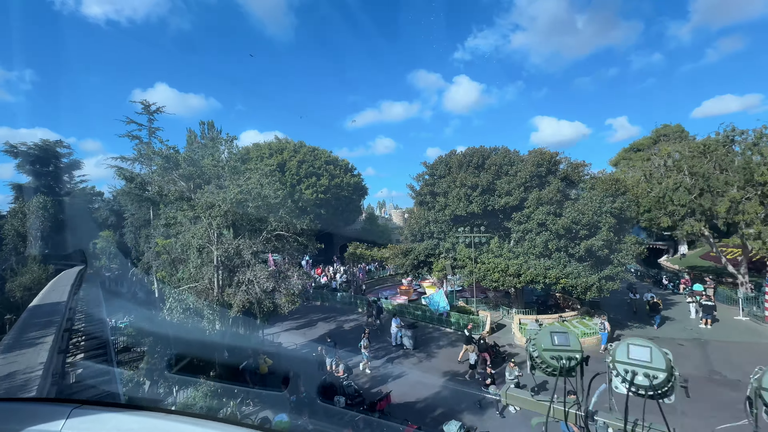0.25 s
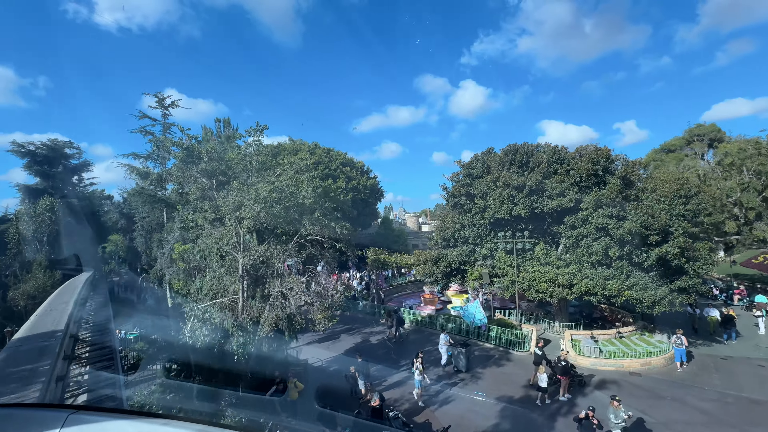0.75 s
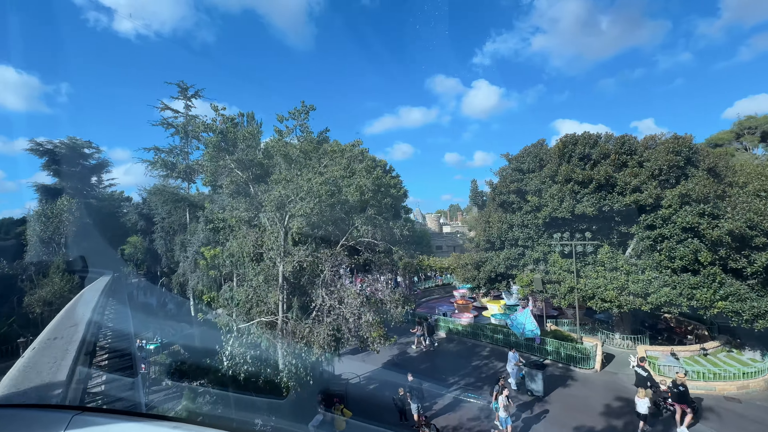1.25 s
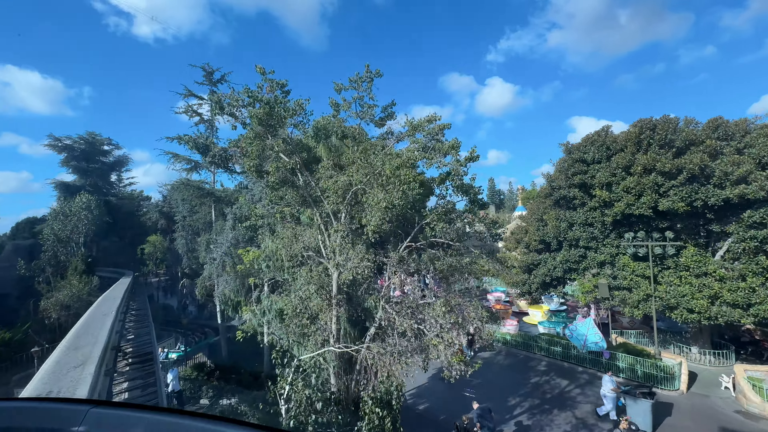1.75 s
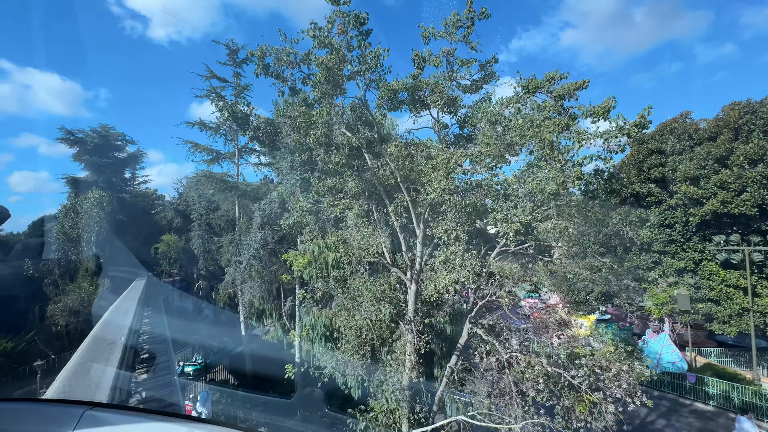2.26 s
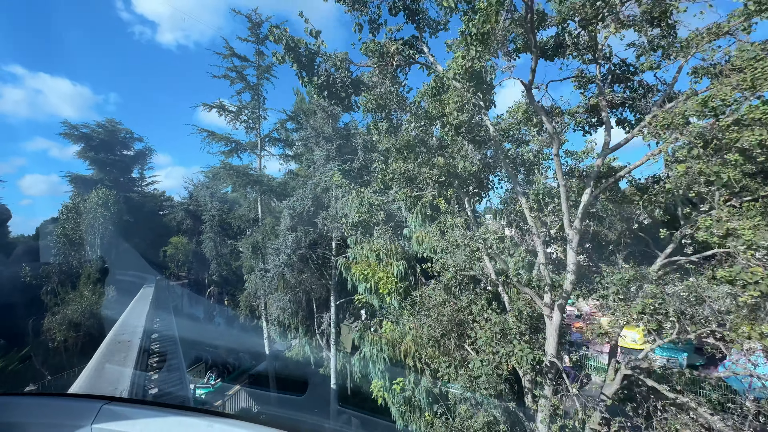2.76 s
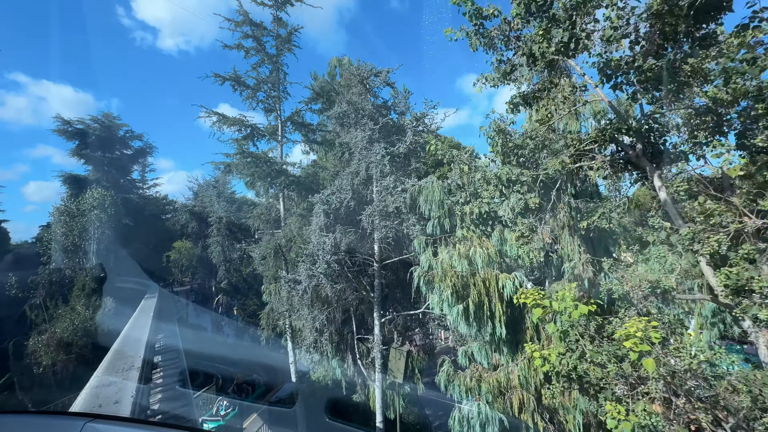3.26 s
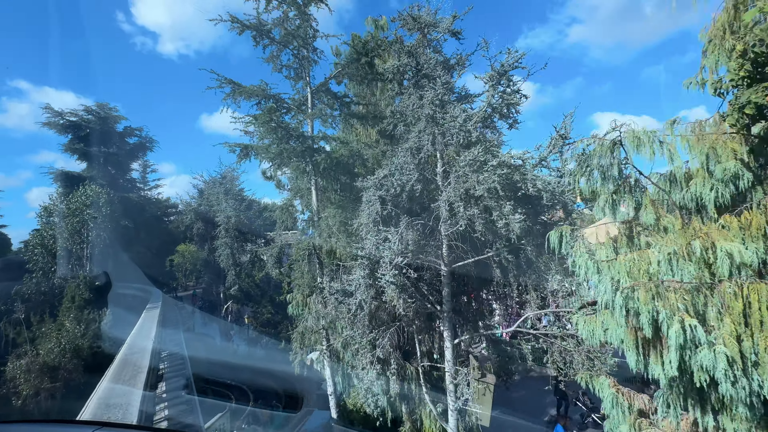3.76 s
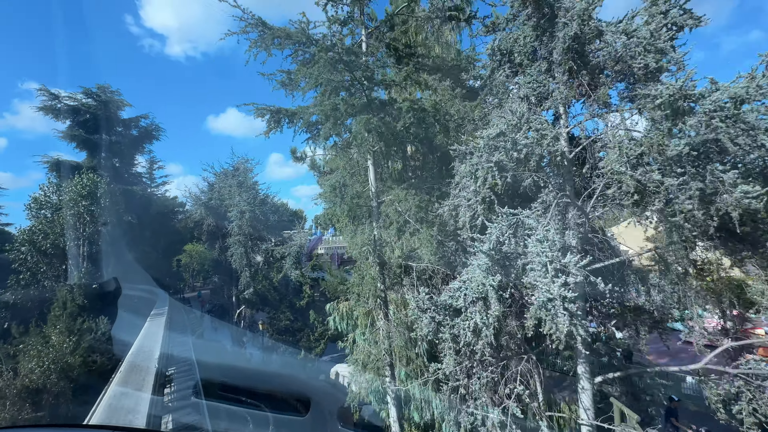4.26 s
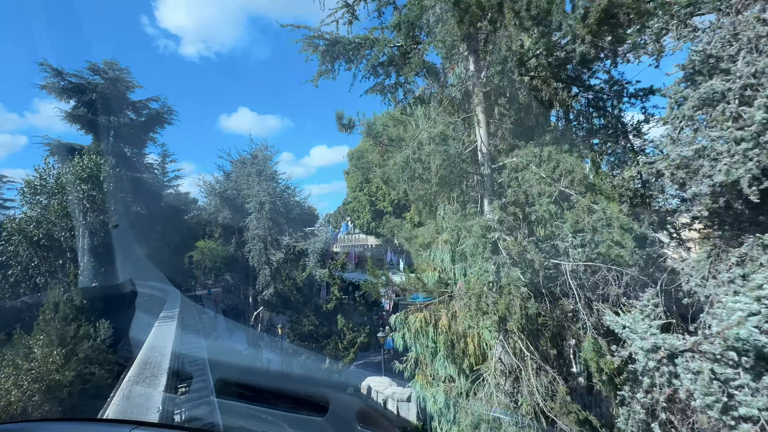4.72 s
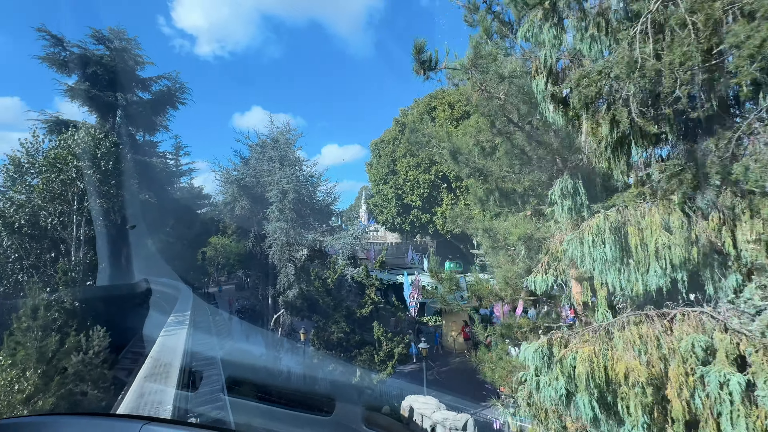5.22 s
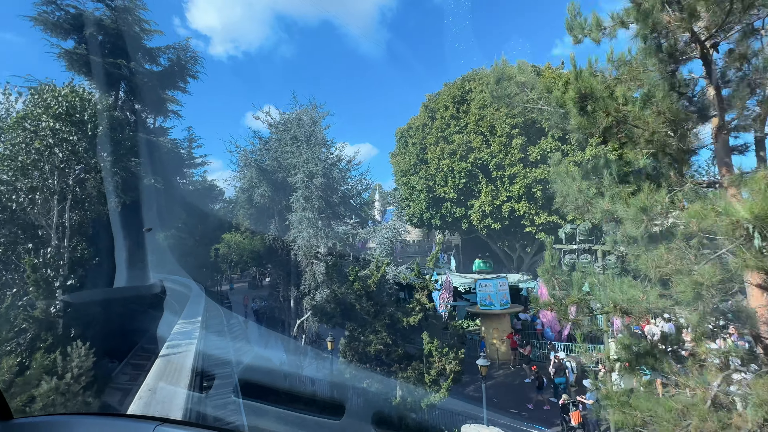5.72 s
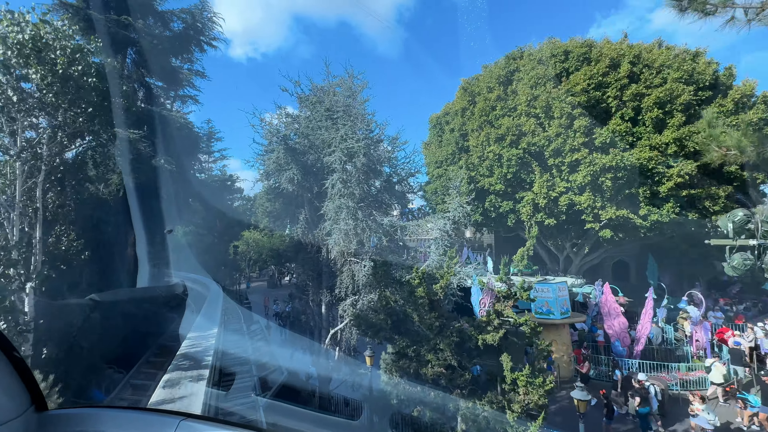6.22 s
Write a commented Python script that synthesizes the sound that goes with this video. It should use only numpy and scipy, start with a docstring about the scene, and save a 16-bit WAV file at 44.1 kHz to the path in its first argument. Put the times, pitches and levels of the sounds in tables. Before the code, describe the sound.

Steady low rumble and booming drone inside the cab of a moving elevated train, with air hiss, a thin whine and occasional light ticks.

```python
"""Inside the front cab of a rubber-tyred elevated train at steady speed.
Tyres on the beam shake the body into a low rumble, two swelling booms and a drone, and stir the cab
air into a roar. Air hisses from the vents, fans and gears hum, and the traction inverter whines in
thin tones of steady pitch. Loose trim ticks now and then, and a panel gives one dull knock."""
import sys
import numpy as np
from scipy import signal
from scipy.fft import rfft, irfft
from scipy.io import wavfile
from scipy.ndimage import uniform_filter1d

SR = 44100
rng = np.random.default_rng(int(sys.argv[2]) if len(sys.argv) > 2 else 0)


def master_out(mix):
    """Clip the mix to full scale and print it as 16-bit PCM to the path in sys.argv[1]."""
    frames = np.transpose(np.atleast_2d(mix))
    ceiling = np.clip(frames, -1, 1)
    pcm = np.round(ceiling * 32767).astype(np.int16)
    wavfile.write(sys.argv[1], SR, pcm)


N = 285768

# How hard the tyres shake the car: (time [s], rumble level [dB], roar level [dB])
TYRE_LEVELS = [(0, -20, -33.5), (.5, -18.5, -31.5), (1.05, -19.5, -32.5), (1.7, -19.5, -32),
               (1.85, -19.5, -31), (2.0, -17.5, -32), (2.2, -18, -32), (2.72, -19.5, -32.5),
               (2.86, -18, -32), (3.1, -18.5, -32), (3.25, -19, -33), (3.45, -18.5, -31.5),
               (3.9, -19.5, -32.5), (4.1, -21.5, -31), (4.17, -16.5, -27.5), (4.26, -16.5, -33.5),
               (4.49, -21, -33.5), (4.56, -19, -29.5), (4.65, -18.5, -32.5), (4.9, -19.5, -32.5),
               (5.4, -19, -32), (6.48, -19, -32.5)]
# Tone colour of the body rumble: (frequency [Hz], relative level [dB])
RUMBLE_EQ = [(22, -38), (36, -29), (44, -8), (60, -2), (90, 1), (107, -8.5), (120, -0.5), (135, -6),
             (152, -10), (178, -7), (208, -4), (232, -16), (350, -15), (430, -30.5)]
# Tone colour of the roar in the cab air: (frequency [Hz], relative level [dB])
ROAR_EQ = [(220, -44), (380, -13), (457, -5.5), (657, -7.5), (735, -14), (921, -11), (1050, -10),
           (1160, -10.5), (2110, -24), (2600, -26.5), (3380, -32), (5720, -120)]
# Narrow cab resonances: (frequency [Hz], width [Hz], left boost [dB], right boost [dB])
CAB_RESONANCES = [(274.7, 35, 5.0, 3), (367.2, 36, 7, 4), (390, 39.4, -7, 5.5), (414, 13.5, 10, 13),
                  (480, 17, -0.5, 3), (535, 6, 5.5, 2), (604, 27, 3, 9), (655.2, 26, 8, 11.5),
                  (713, 37, 6.5, -6), (785.6, 24, 12, 9), (832, 14.4, 5.5, 11), (878, 36, 7.5, -5),
                  (937.5, 34, 9, 6.5), (1063, 13, 5, 2.5), (1140, 29, 8.5, 3), (1196.5, 27, 10, -3),
                  (1226, 19, -2, 5), (1287, 21, -11, 0), (1309, 28, 8, 10.5), (1422, 19, 7, -4),
                  (1488, 25, 8, 7), (1520, 21, 3, 1), (1643, 19, 2, 10.5), (1757, 22.0, 3.5, 5),
                  (1887, 16, 9.5, -9), (1974, 18, 6.5, -6), (1970, 18, 1, 7), (2786, 61, 3.5, 7),
                  (3530, 33, 9, 2)]
# Swells of the body's main boom: (time [s], level [dB])
MAIN_BOOM_SWELLS = [(0.0, -19.5), (0.27, -25), (0.49, -15), (0.78, -26.5), (0.99, -19), (1.06, -26.5),
                    (1.14, -13.5), (1.19, -33), (1.26, -15.5), (1.41, -23), (1.43, -19), (2.06, -19.5),
                    (2.15, -44), (2.18, -25), (2.33, -14.5), (2.36, -24), (2.62, -14.5), (2.76, -31),
                    (2.81, -13), (2.91, -37), (3.08, -15.5), (3.14, -33.5), (3.19, -13.5), (3.48, -23),
                    (3.61, -18.5), (5.22, -17), (5.23, -26.5), (5.54, -16), (5.76, -24), (5.81, -15.5),
                    (6.12, -26), (6.35, -19), (6.43, -33), (6.48, -17)]
# Swells of the deeper boom: (time [s], level [dB])
DEEP_BOOM_SWELLS = [(0.0, -32), (0.87, -20), (0.97, -26), (2.91, -26.5), (3.66, -30), (3.92, -20),
                    (4.1, -45), (4.19, -19), (4.93, -26), (5.07, -26.5), (5.12, -35), (5.31, -19.5),
                    (5.58, -32), (6.48, -25)]
# Tone colour of the vent hiss: (frequency [Hz], relative level [dB])
VENT_EQ = [(1500, -2.5), (2200, -1.5), (2900, -0.5), (3300, -3.5), (3900, -1), (4600, -3.5), (6000, -5),
           (7300, -10), (9000, -9.5), (10200, -14), (12000, -16.5), (14000, -20), (15000, -19),
           (15600, -19)]
# Fan and gear hums; pan is always left minus right: (frequency [Hz], level [dB], pan [dB])
HUM_TONES = [(208, -37.5, -1.5), (270.5, -42, 1), (360, -43.5, 3), (436, -50, 6), (544.5, -54, 5.5)]
# Strong inverter sidebands: (carrier multiple, motor multiple)
STRONG_WHINE_ORDERS = [(1, -3), (1, -1), (1, 1), (1, 5), (2, -6), (2, 0), (2, 4), (2, 6)]
# Their separate swells: (time [s], level of each tone [dB])
STRONG_WHINE_LEVELS = [(0.0, -65, -58, -61, -62, -61.0, -57, -71.0, -72.0),
                       (0.27, -64, -62, -60, -55, -57.0, -58.0, -75.0, -70.0),
                       (0.54, -60, -54, -61.0, -61.0, -62.0, -58.0, -77.0, -67.0),
                       (0.81, -61.0, -63.0, -63, -62.0, -63.0, -49, -68.0, -66.0),
                       (1.08, -64.0, -59, -54, -63.0, -65, -62, -68.0, -64.0),
                       (1.35, -69.0, -54, -59, -62.0, -71, -64, -64.0, -68),
                       (1.62, -66.5, -66, -54.5, -62, -68, -65, -68, -68),
                       (1.89, -60, -66.0, -53.5, -61.0, -67.0, -57.0, -70.0, -79.0),
                       (2.16, -60, -64.0, -63, -59, -65.0, -53.5, -66.0, -66.0),
                       (2.43, -61.0, -61.0, -61, -58, -60.0, -61, -67.0, -68.0),
                       (2.7, -64.0, -64, -59, -56, -66.0, -58.0, -70.0, -62.0),
                       (2.97, -65.0, -57, -59.0, -57, -65.0, -58.0, -67.0, -71.0),
                       (3.24, -60.0, -63, -62, -61.0, -62, -61, -68.0, -73.0),
                       (3.51, -55, -64.0, -61, -60, -63.0, -61, -66.0, -69.0),
                       (3.78, -62.0, -62, -60, -58.0, -58.0, -64.0, -65.0, -72.0),
                       (4.05, -59.0, -63, -57, -59.0, -63.0, -63.0, -69.0, -69.0),
                       (4.32, -60.0, -63, -61, -63.0, -57, -55, -69.0, -63),
                       (4.59, -61, -58.0, -54, -58, -62, -65, -67.0, -59),
                       (4.86, -60.0, -56, -53, -66.0, -61.0, -57.0, -62, -65.0),
                       (5.13, -62.0, -58.0, -56.0, -66.0, -63.0, -65, -78.0, -59),
                       (5.4, -59, -62, -55, -56, -63, -67.0, -70.0, -65.0),
                       (5.67, -60.0, -58.0, -55, -56, -60, -61.0, -71.0, -59),
                       (5.94, -62.0, -52, -55.0, -64, -62, -63, -69.0, -66.0),
                       (6.21, -63.0, -57.0, -55.0, -59.0, -61.0, -60, -67.0, -67.0),
                       (6.48, -64.0, -55, -55.0, -59.0, -63.0, -57.0, -64.0, -63.0)]
# Their drift between the sides as the car sways: (time [s], pan of each tone [dB])
STRONG_WHINE_PANS = [(0.0, 5.0, -0.0, -9.0, -2.0, 5.0, -9.0, 7.0, 8.0),
                     (0.27, 3.0, -0.0, -15.0, -2.0, 3.0, -11.0, -5.0, -2.0),
                     (0.54, 4.0, 1.0, -15.0, 2.0, 0.0, -0.0, 5.0, 0.0),
                     (0.81, 10.0, 11.0, -4.0, -1.0, 3.0, 3.0, -4.0, 6.0),
                     (1.08, 0.0, 3.0, 1.0, -0.0, -6.0, 8.0, -8.0, -1.0),
                     (1.35, -7.0, 1.0, 2.0, -4.0, -0.0, -7.0, -8.0, -5.0),
                     (1.62, 0.0, -5.0, 15.0, 1.0, 2.0, 3.0, -6.0, -3.0),
                     (1.89, 5.0, 1.0, 10.0, 0.0, 4.0, -2.0, -3.0, 8.0),
                     (2.16, 6.0, -3.0, 4.0, -1.0, -3.0, 3.0, 7.0, -11.0),
                     (2.43, 2.0, 1.0, 6.0, -1.0, 0.0, -6, -1.0, 3.0),
                     (2.7, -5.0, -5.0, 5.0, 4.0, 13.0, 7, 11.0, 7.0),
                     (2.97, -6.0, -1.0, 7.0, 2.0, 3.0, 7.0, 5.0, 2.0),
                     (3.24, 7.0, -1.0, 3.0, -1.0, 12.0, 6.0, -2.0, -4.0),
                     (3.51, 7.0, 3.0, 2.0, -5.0, 6.0, -1.0, 1.0, 5.0),
                     (3.78, 10.0, -1.0, 4.0, -6.0, 15.0, -9.0, 4.0, -2.0),
                     (4.05, 9.0, 8.0, 2.0, -5.0, 8.0, -2.0, 7.0, 7.0),
                     (4.32, 8.0, 3.0, 2.0, 0.0, 10.0, -7, 3.0, 11.0),
                     (4.59, 7.0, 6.0, 9.0, 2.0, -7.0, -9.0, -9.0, 2.0),
                     (4.86, 2.0, 4.0, 11.0, -1.0, 0.0, 7.0, -13.0, 11.0),
                     (5.13, -1.0, 11.0, 6.0, -3.0, 5.0, -6.0, -7.0, 4.0),
                     (5.4, 5.0, 8.0, 6.0, -3.0, -1.0, -0.0, -3.0, -8.0),
                     (5.67, 11.0, 10.0, 2.0, -1.0, 7.0, 4.0, 9.0, -2.0),
                     (5.94, 4.0, 15.0, 4.0, -2.0, 14.0, -7.0, -5.0, -3.0),
                     (6.21, 4.0, 9.0, 4.0, -10.0, 6.0, -11.0, -1.0, -8.0),
                     (6.48, 3.0, 13.0, 5.0, -9.0, 1.0, -9.0, 6.0, -4.0)]
# Their mean stereo phase, one per tone: (right lead [rad])
STRONG_WHINE_PHASES = [1.5, 1.4, 1.05, 1.23, 1.8, 1.1, 1.4, 1.0]
# Faint inverter sidebands: (carrier multiple, motor multiple)
FAINT_WHINE_ORDERS = [(1, -7), (1, -5), (1, 3), (2, -4), (2, -2), (2, 2), (2, 8), (3, -13), (3, -11),
                      (3, -9), (3, -7), (3, -1)]
# Their place in the mix: (level [dB], pan [dB])
FAINT_WHINE_MIX = [(-75, 6), (-64.5, 8), (-70, 4), (-71.5, 5), (-71.5, 3), (-72, 1), (-78, 0), (-77.5, 0),
                   (-85, 0), (-80, 0), (-82, 0), (-86, 0)]
# Thin tones in the top treble: (frequency [Hz], level [dB], pan [dB])
TOP_WHINE_TONES = [(12498.5, -84, 0), (12640.4, -84, 0), (15428, -85, 0), (15698, -75, 0)]
# Loose trim: (time [s], peak [dB], pan [dB], tilt [dB/octave], rattle relative to crack [dB])
TRIM_TICKS = [(0.553, -31, 1, -5, -2), (2.0132, -27, -1, -2.5, -16), (2.9772, -39, 3.0, -3, -8),
              (4.788, -28.5, 1, -2, -16), (5.232, -35, 3, -4, -9)]
# Modes of a flexing panel: (frequency [Hz], relative level [dB], t60 [s], pan [dB], glide [Hz/s])
PANEL_MODES = [(446, 4, 0.091, -6, -500), (572, 5, 0.084, 12, -2500), (624, 2.5, 0.1, 11, 3500)]
# How alike left and right sound: (frequency [Hz], likeness [0-1])
STEREO_LIKENESS = [(60, 0.92), (200, 0.94), (320, 0.12), (560, 0.9), (750, 0.13), (3000, 0.066),
                   (5000, 0.044), (8800, 0.12), (9600, 0.72), (10200, 0.59), (10800, .999)]
# Balance across the spectrum: (frequency [Hz], pan [dB])
STEREO_PAN = [(60, 6), (92, 2.5), (140, 6.5), (210, 2), (330, 1.5), (500, 7.5), (770, 5.5), (1170, 2.5),
              (1790, 4.5), (2740, 2.5), (4190, 2.5), (6410, 5.5), (9810, -1), (15000, 0.5)]
# Phase between the sides: (frequency [Hz], left lead [rad])
STEREO_LEAD = [(60, 0.44), (280, 0.04), (500, 3.73), (1200, 3.1), (3000, 8.43), (4100, 12), (4500, 13.1),
               (5900, 16.8), (6500, 21.4), (7200, 16.6), (7700, 25.7), (8100, 27.2), (8800, 21.3)]

CARRIER_HZ, MOTOR_HZ = 3999.6, 71.32
FLIP_HZ, FLIP_EVERY_HZ = 10970, 1510  # the top treble steps between in phase and out of phase


def tyres():
    """Tread and beam roughness drive the body (rumble) and the cab air (roar)."""
    rumble_db, roar_db = automation(TYRE_LEVELS)
    rumble = noise(lambda hz: eq_db(RUMBLE_EQ, hz, 31) + cab_db(hz), 4096, patchy_db=0.89, flicker_db=0.32)
    roar = noise(lambda hz: eq_db(ROAR_EQ, hz, 25) + cab_db(hz), 4096, patchy_db=1.0, flicker_db=0.63)
    return gain_of(rumble_db) * rumble + gain_of(roar_db) * roar


def boom(hz, swells, pan_db, rough_db, jolt_hz, waver_hz):
    """A body mode kept ringing by the ride: one tone, shaken in level and pitch by small jolts."""
    shake, waver = drift(jolt_hz, count=2)
    phase = 2 * np.pi * np.cumsum(hz + waver_hz * waver) / SR
    db = automation(swells)[0] + rough_db * shake
    return pan(pan_db) * gain_of(db) * np.sqrt(2) * np.sin(phase)


def drone(centre_hz=151.1, width_hz=29.5, level_db=-24.5):
    """Noise held in one broad resonance of the body."""
    band = noise(lambda hz: -20 * np.log10(1 + (2 * (hz - centre_hz) / width_hz) ** 4), 8192)
    return gain_of(level_db) * band


def fans_and_gears():
    """Low machine hums, each fading and wavering on its own."""
    return tones(*np.transpose(HUM_TONES), fade_db=5.0, fade_hz=2.92, waver_hz=1.66, spread_rad=0.33)


def vents(level_db=-43.5):
    """Air hisses from the vents and leaks past the doors, coloured by the cab."""
    hiss = noise(lambda hz: eq_db(VENT_EQ, hz, 32) + crowded_modes_db(hz) + cab_db(hz), 2048,
                 patchy_db=0.88, flicker_db=0.47)
    return gain_of(level_db) * hiss


def inverter():
    """Switching whine: motor sidebands around the carrier's multiples, with thin tones on top."""
    faint_hz = np.dot(FAINT_WHINE_ORDERS, [CARRIER_HZ, MOTOR_HZ])
    strong_hz = np.dot(STRONG_WHINE_ORDERS, [CARRIER_HZ, MOTOR_HZ])
    faint = tones(faint_hz, *np.transpose(FAINT_WHINE_MIX),
                  fade_db=2.5, fade_hz=2.5, waver_hz=0.88, spread_rad=0.8)
    strong = tones(strong_hz, automation(STRONG_WHINE_LEVELS), automation(STRONG_WHINE_PANS),
                   fade_db=2, fade_hz=11, waver_hz=1.65, spread_rad=0.8, leads=STRONG_WHINE_PHASES)
    top = tones(*np.transpose(TOP_WHINE_TONES), fade_db=3.0, fade_hz=1.5, waver_hz=0.8, spread_rad=0.3)
    return faint + strong + top


def trim_ticks(attack_s=0.0012, crack_t60_s=0.016, rattle_t60_s=0.14):
    """Loose trim ticks: each a short, bright crack with a rattle behind it."""
    out, t = np.zeros((2, N)), np.arange(-256, 3840) / SR
    hz, age = np.fft.rfftfreq(len(t), 1 / SR), np.maximum(t, 0)
    left, right, likeness = stereo_field(hz)
    attack = 1 - np.exp(-age / attack_s)
    band = 1 / (1 + (3500 / (hz + 1)) ** 4) / (1 + (hz / 13000) ** 4)
    for time_s, peak_db, pan_db, tilt_db, rattle_db in TRIM_TICKS:
        decay = gain_of(-60 * age / crack_t60_s) + gain_of(rattle_db - 60 * age / rattle_t60_s)
        shared, separate = rfft(rng.standard_normal((2, len(t))) * attack * decay)
        colour = band * gain_of(tilt_db * np.log2((hz + 1) / 8000))
        crack = irfft(colour * np.array([left * shared, right * blend(shared, separate, likeness)]))
        add(out, time_s + t[0], pan(pan_db) * gain_of(peak_db) * crack / abs(crack).max())
    return out


def panel_knock(time_s=0.519, gain_db=-20.5, attack_s=0.0096):
    """One dull knock rings three modes whose pitches slide as the panel flexes."""
    out, t = np.zeros((2, N)), np.arange(8192) / SR
    ring = sum(pan(pan_db) * gain_of(db - 60 * t / t60) * np.sin(2 * np.pi * (hz + glide * t / 2) * t)
               for hz, db, t60, pan_db, glide in PANEL_MODES)
    add(out, time_s, gain_of(gain_db) * ring * (1 - np.exp(-t / attack_s)) ** 2)
    return out


def cab_db(hz):
    """Narrow cab resonances boost the noise near them, differently on each side."""
    return sum(np.reshape(boost, (2, 1, 1)) / (1 + (2 * (hz - centre) / width) ** 4)
               for centre, width, *boost in CAB_RESONANCES)


def crowded_modes_db(hz, ripple_db=3.1):
    """The cab's higher modes crowd into a random, static ripple that smooths out in the treble."""
    ripple = unit_rms(uniform_filter1d(rng.standard_normal((2, len(hz), 1)), size=2, axis=1))
    return ripple_db * ripple / (1 + (hz / 6000) ** 6)


def noise(colour_db, fft_size, patchy_db=0, flicker_db=0):
    """Coloured stereo noise of rms 1, with drifting spectral patches and a broadband flicker."""
    hop = fft_size // 4
    frames, hz = N // hop + 5, np.fft.rfftfreq(fft_size, 1 / SR)[:, None]
    draws = rng.standard_normal((frames, len(hz), 5)).T
    shared, separate = draws[0] + 1j * draws[1], draws[2] + 1j * draws[3]
    patches = uniform_filter1d(draws[4], size=fft_size // 80, axis=0)
    patches = unit_rms(uniform_filter1d(patches, size=8, axis=1))
    flicker = unit_rms(uniform_filter1d(rng.standard_normal(frames), size=4))
    left, right, likeness = stereo_field(hz)
    # a resonance reaches both sides more alike
    likeness = 1 - (1 - likeness) / gain_of(0.5 * np.maximum(cab_db(hz)[0], 0))
    spectra = np.array([left * shared, right * blend(shared, separate, likeness)])
    spectra *= gain_of(colour_db(hz) + patchy_db * patches + flicker_db * flicker)
    return unit_rms(signal.istft(spectra, nperseg=fft_size, noverlap=fft_size - hop)[1][:, :N])


def tones(pitches_hz, levels_db, pans_db, fade_db, fade_hz, waver_hz, spread_rad, leads=None):
    """Held tones that fade on each side; shifting reflections turn the sides apart in phase."""
    t, out = np.arange(N) / SR, np.zeros((2, N))
    if leads is None:
        leads = [np.angle(stereo_field(hz)[1]) for hz in pitches_hz]
    for hz, db, pan_db, mean_lead in zip(pitches_hz, levels_db, pans_db, leads):
        likeness = stereo_field(hz)[2]
        left, right, both, waver = drift(fade_hz, count=4)
        left, right = np.sqrt(1 - likeness ** 2) * np.array([left, right])  # alike sides fade together
        left_gain = gain_of(db + fade_db * (0.51 * left + 0.62 * both))
        right_gain = gain_of(db + fade_db * (0.69 * right + 0.6 * both))
        phase = 2 * np.pi * (hz * t + np.cumsum(waver_hz * waver) / SR + rng.random())
        lead = mean_lead + spread_rad * drift(top_hz=0.5, count=1)[0] * (1 - likeness)
        left_share = 1 / (1 + gain_of(-2 * pan_db))  # of the power
        out[0] += np.sqrt(left_share) * left_gain * np.sin(phase)
        out[1] += np.sqrt(1 - left_share) * right_gain * np.sin(phase + lead)
    return 2 * out


def stereo_field(hz):
    """Left gain, right gain with its phase, and the likeness of the sides."""
    turn = np.pi * (hz - FLIP_HZ) / FLIP_EVERY_HZ
    steps = turn - np.sin(2 * turn) / 2
    steps = steps - np.sin(2 * steps) / 2
    lead = np.where(hz < STEREO_LEAD[-1][0], lookup(STEREO_LEAD, hz), -steps)
    left = gain_of(lookup(STEREO_PAN, hz) / 2)
    return left, np.exp(-1j * lead) / left, np.clip(lookup(STEREO_LIKENESS, hz), 0, 1)


def blend(shared, separate, likeness):
    """Equal-power mix of two noises."""
    return likeness * shared + np.sqrt(1 - likeness ** 2) * separate


def eq_db(points, hz, rolloff_db):
    """An EQ curve that falls by rolloff_db per octave outside its table."""
    below, above = np.log2(points[0][0] / (hz + 1)), np.log2((hz + 1) / points[-1][0])
    return lookup(points, hz) - rolloff_db * (np.maximum(below, 0) + np.maximum(above, 0))


def lookup(points, hz):
    """Reads a table on a log frequency axis."""
    table_hz, values = np.transpose(points)
    return np.interp(np.log(hz + 1), np.log(table_hz + 1), values)


def automation(rows):
    """One curve per value column of a time table."""
    times, *columns = np.transpose(rows)
    return [np.interp(np.arange(N) / SR, times, column) for column in columns]


def drift(top_hz, count):
    """Slow random wander of rms 1, in count rows."""
    steps = N // 64 + 2
    hz = np.fft.rfftfreq(steps, 64 / SR)
    slow = irfft(rfft(rng.standard_normal((count, steps))) * (hz > 0) / (1 + (hz / top_hz) ** 4), steps)
    return np.array([np.interp(np.arange(N) / 64, np.arange(steps), unit_rms(row)) for row in slow])


def add(mix, time_s, sound):
    """Drops a short sound into the mix."""
    part = mix[:, round(time_s * SR):][:, :sound.shape[1]]
    part += sound[:, :part.shape[1]]


def pan(db):
    """Left and right gains, db apart."""
    return gain_of([[db / 2], [-db / 2]])


def gain_of(db):
    """Decibels to amplitude."""
    return 10 ** (np.asarray(db) / 20)


def unit_rms(x):
    """Scales to rms 1."""
    return x / np.sqrt(np.mean(x ** 2) + 1e-20)


def scene():
    """The stereo mix: a bed of tyre and body noise under hiss, hums, whine and small impacts."""
    hums = fans_and_gears()
    main_boom = boom(70.1, MAIN_BOOM_SWELLS, pan_db=3.0, rough_db=1.5, jolt_hz=8.1, waver_hz=2.39)
    deep_boom = boom(50.6, DEEP_BOOM_SWELLS, pan_db=2.1, rough_db=-0.5, jolt_hz=6.45, waver_hz=3.14)
    body = main_boom + deep_boom + drone()
    return tyres() + body + hums + vents() + inverter() + trim_ticks() + panel_knock()


def record(dry, cutoff_hz=15770):
    """A steep low-pass takes off the very top."""
    padded = np.pad(dry, ((0, 0), (512, 512)), "reflect", reflect_type="odd")
    lowpass = signal.firwin(1025, cutoff_hz, window=("kaiser", 9), fs=SR)
    return signal.oaconvolve(padded, lowpass[None], "valid")


dry = scene()
out = record(dry)
master_out(out)
```